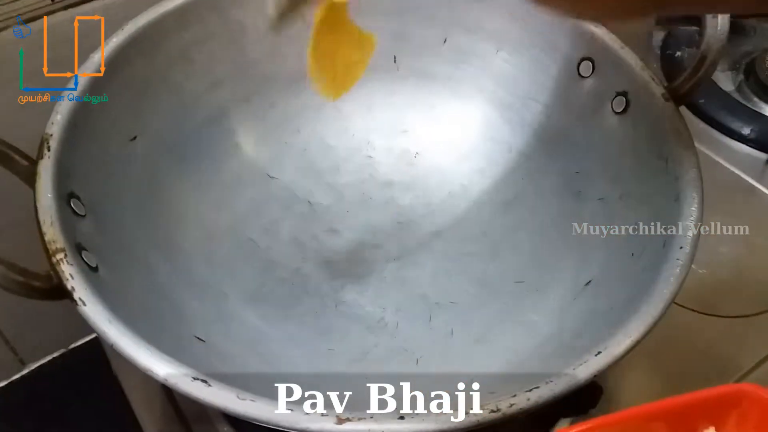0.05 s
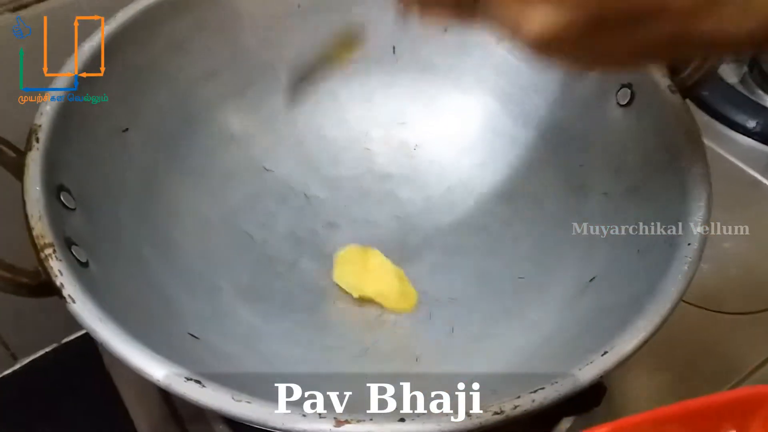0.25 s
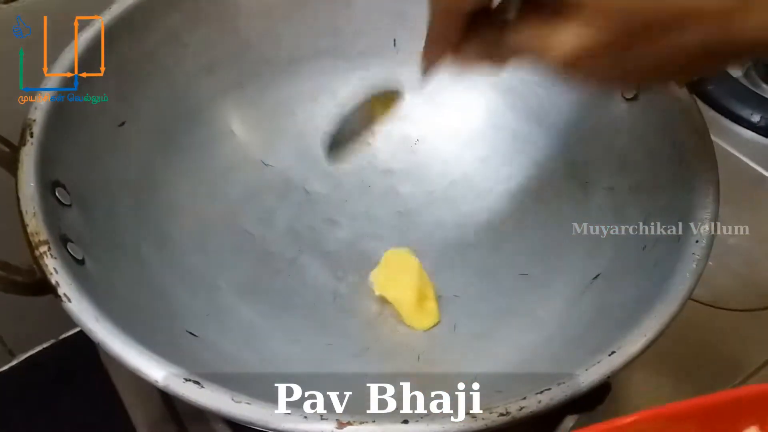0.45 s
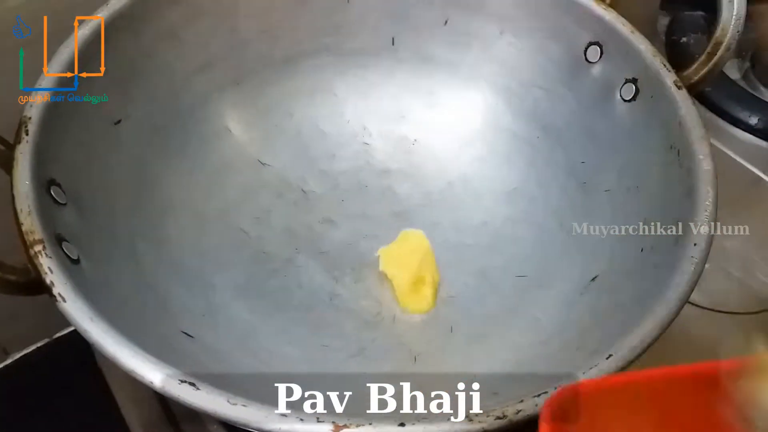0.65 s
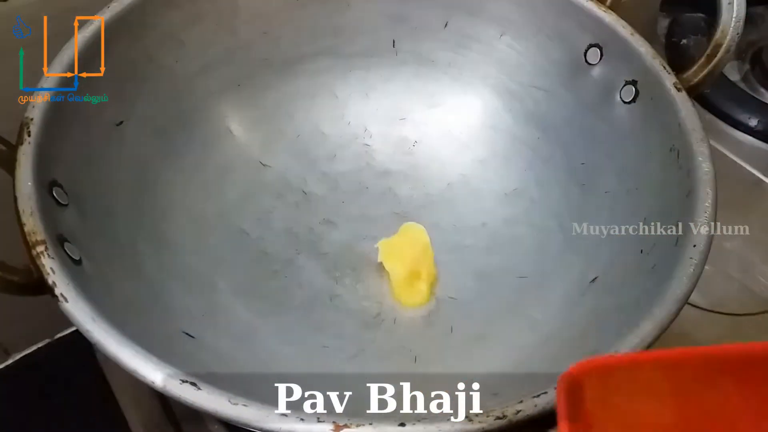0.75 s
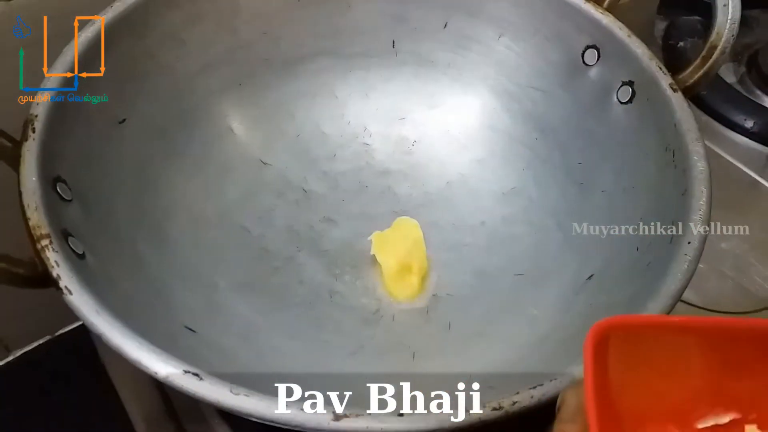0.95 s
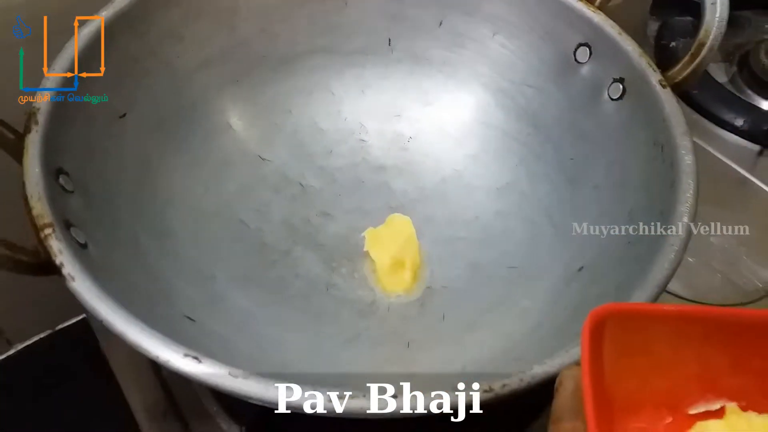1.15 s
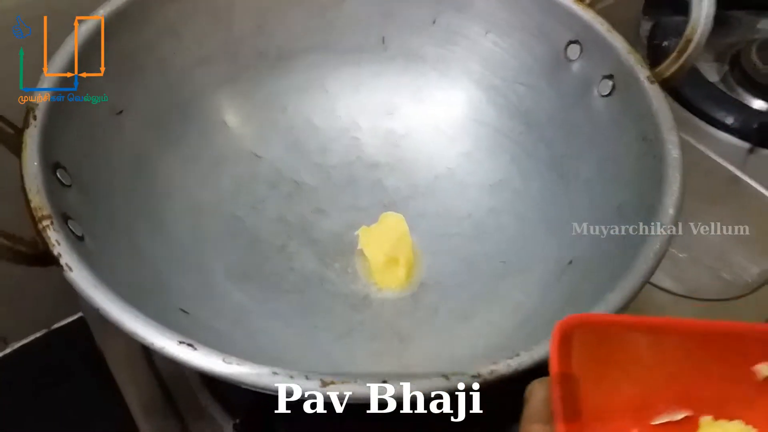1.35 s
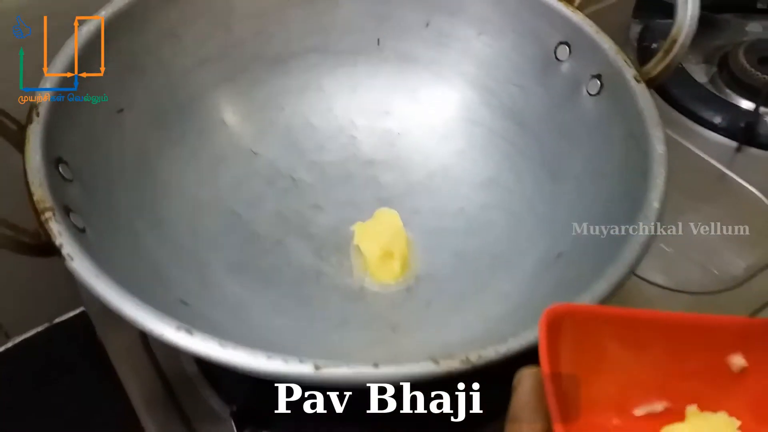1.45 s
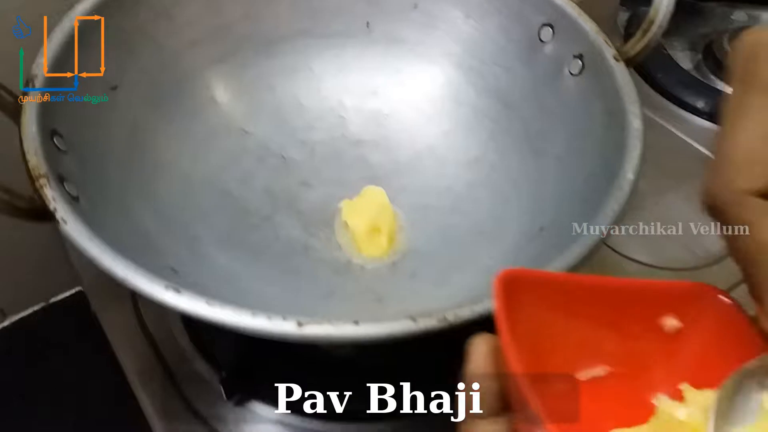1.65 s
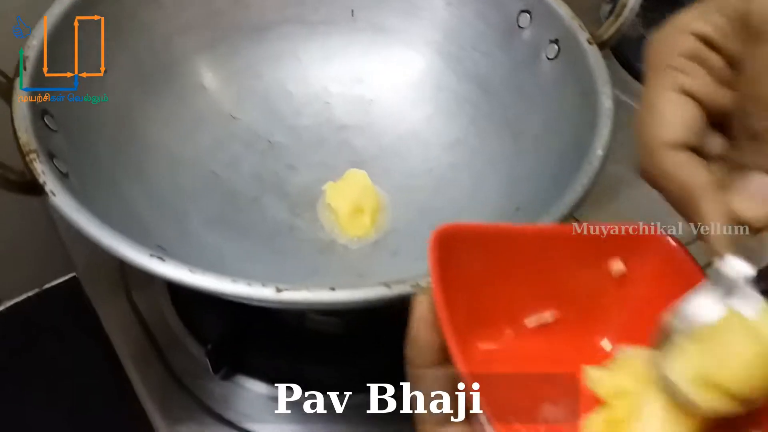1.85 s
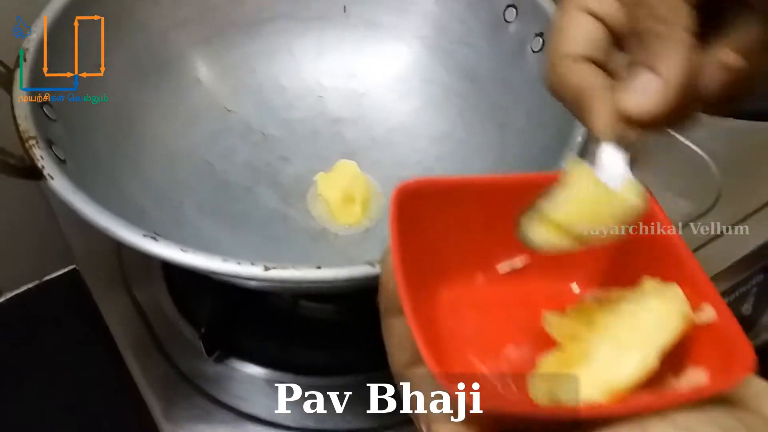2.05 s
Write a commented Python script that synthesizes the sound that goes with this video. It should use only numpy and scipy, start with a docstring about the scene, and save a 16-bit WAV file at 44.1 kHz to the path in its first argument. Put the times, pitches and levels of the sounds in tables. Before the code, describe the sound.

Butter lands in a hot metal wok and bursts into a dense, bright sizzle with scattered pops and a brief low metallic hum; later a spoon knocks a plastic dish three times, close up in a small kitchen.

```python
"""Over burner hiss, room rumble and a thin whine a faint hiss swells, close to a phone microphone in a small kitchen.
At 0.22 s a lump of butter lands in a hot metal wok: steam bubbles burst as a dense fizz (clumped noise puffs)
with scattered pops (resonated bursts), and the wok and its stand hum (noise-driven modes) while the lump slides.
From 1.06 s a spoon knocks a plastic dish three times (damped sines), then scrapes it (four resonant clicks)."""
import sys
import numpy as np
from scipy import signal
from scipy.fft import rfft, irfft
from scipy.io import wavfile
from scipy.ndimage import uniform_filter1d

SR = 44100
rng = np.random.default_rng(int(sys.argv[2]) if len(sys.argv) > 2 else 0)


def to_wav(s):
    """Save 16-bit WAV."""
    ch = np.atleast_2d(s).T  # columns
    pcm = np.round(np.clip(ch, -1, 1) * 32767)  # PCM
    wavfile.write(sys.argv[1], SR, pcm.astype(np.int16))


def amp(db):
    return 10 ** (np.asarray(db, float) / 20)


N = 92610


def evened(x):
    """Scales to rms 1."""
    return x / np.sqrt(np.mean(x ** 2) + 1e-20)


def add(mix, start_s, sound):
    """Mixes a sound in at a time, cut at the end of the mix."""
    part = mix[round(start_s * SR):][:len(sound)]
    part += sound[:len(part)]


def coloured(x, points):
    """Filters by a spectrum table (Hz, dB), interpolated over log frequency; rms 1."""
    point_hz, point_db = np.transpose(points)
    hz = np.fft.rfftfreq(len(x), 1 / SR)
    gain_db = np.interp(np.log(hz + 1), np.log(point_hz + 1), point_db, -90)
    return evened(irfft(rfft(x) * amp(gain_db), len(x)))


def curve(table, axis):
    """Gain over time from one dB column, rising from zero when the butter lands."""
    land_s, rise_s = 0.2213, 0.0031
    t = np.arange(N) / SR
    rows = np.array(table)
    return amp(np.interp(t, rows[:, 0], rows[:, axis])) * np.clip((t - land_s) / rise_s, 0, 1)


def resonate(x, hz, width_hz):
    """One-pole lowpass shifted up to hz: a resonance of gain 1."""
    turn = np.exp(2j * np.pi * hz * np.arange(len(x)) / SR)
    r = np.exp(-np.pi * width_hz / SR)
    return 2 * (turn * signal.lfilter([1 - r], [1, -r], x / turn)).real


def resonate_twice(x, hz, width_hz):
    """Two equal resonances in a row, for steeper skirts and a softer onset."""
    return resonate(resonate(x, hz, width_hz), hz, width_hz)


def burner_and_room():
    """Steady burner hiss and room rumble: noise of one fixed colour."""
    # Spectrum of burner and room: (frequency [Hz], density [dB per Hz, relative])
    air_colour = [(30, -21.5), (96, -1.5), (161, -4.5), (202, -12), (230, -11), (681, -19.5), (755, -26),
                  (5800, -31), (7120, -9.5), (8320, -27), (11000, -30.5), (14300, -37)]
    return amp(-66) * coloured(rng.standard_normal(N), air_colour)


def whine():
    """Thin steady electrical whine: sines."""
    # Whine partials: (frequency [Hz], rms level [dB])
    partials = [(14820, -74.5)]
    t = np.arange(N) / SR
    return sum(amp(db) * np.sqrt(2) * np.sin(2 * np.pi * hz * t) for hz, db in partials)


def swelling_hiss():
    """Faint hiss that ramps up before the landing and then stays: coloured noise."""
    # Spectrum of the hiss: (frequency [Hz], density [dB per Hz, relative])
    swell_colour = [(3200, -8), (4600, -12), (5600, -7), (7000, -37)]
    start_s, rise_s, level_db = 0.073, 0.036, -76
    ramp = np.clip((np.arange(N) / SR - start_s) / rise_s, 0, 1)
    return amp(level_db) * coloured(rng.standard_normal(N), swell_colour) * ramp


def bubbles():
    """Clumped bursts, each a tiny puff of dying noise, mostly small, over smooth steam hiss."""
    bursts_per_s, spread_db, burst_t60_s = 4000, 3.5, 0.011
    clump_db, hiss_db = 1, 0
    drift = uniform_filter1d(rng.standard_normal(N), size=350)
    clump = evened(uniform_filter1d(drift, size=350))
    burst = rng.random(N) < bursts_per_s / SR
    size = burst * amp(spread_db * np.minimum(rng.exponential(1, N), 5))
    # -120 because amp() halves the decibels of a power
    power = signal.lfilter([1], [1, -amp(-120 / burst_t60_s / SR)], size ** 2)
    puffs = evened(np.sqrt(power) * rng.standard_normal(N))
    return amp(clump_db * clump) * (puffs + amp(hiss_db) * rng.standard_normal(N))


def sizzle():
    """The same bubbles filtered into three ranges, each with its own level over time."""
    # Sizzle levels: (time [s], fizz [dB], treble [dB], coarse bubbling [dB])
    fizz_levels = [(.225, -33.5, -56, -67), (.25, -35.5, -40, -48), (.275, -37, -43.5, -43.5),
                   (.31, -39.5, -47.5, -51), (.36, -38, -41.5, -56), (.44, -34.5, -46.5, -53),
                   (.52, -35.5, -43, -58.5), (.58, -38.5, -45.5, -58), (.69, -37, -48.5, -56.5),
                   (.73, -37, -47, -43.5), (.9, -35.5, -48, -49.5), (1.0, -35.5, -46, -50),
                   (1.12, -35, -45.5, -56), (1.27, -39, -50.5, -58.5), (1.38, -37, -47.5, -49),
                   (1.5, -38.5, -49.5, -54), (1.7, -38.5, -50, -46.5), (1.82, -40.5, -51.5, -57.5),
                   (2.1, -41, -52, -62.5)]
    # Spectra of fizz, treble and coarse bubbling: (frequency [Hz], density [dB per Hz, relative])
    fizz_colour = [(1290, -43), (2200, -24.5), (2580, -20), (3200, -3), (3580, -8.5), (4080, -2),
                   (5790, -4.5), (7600, 0), (8230, -1.5), (9600, -18.5), (12500, -48)]
    treble_colour = [(6120, -56.5), (10400, -11.5), (12000, -9), (13300, -5.5), (15000, -11), (16200, -27)]
    coarse_colour = [(650, -14), (1100, -11), (1630, -3), (2390, 5.5), (2740, -5), (3000, 1.5), (3900, 2.5),
                     (6600, -120)]
    b = bubbles()
    colours = (fizz_colour, treble_colour, coarse_colour)
    return sum(coloured(b, colour) * curve(fizz_levels, axis=k + 1) for k, colour in enumerate(colours))


def wok():
    """The boiling lump shakes the wok's modes and its stand as it slides: noise through resonances."""
    # Slide levels: (time [s], stand's rumble [dB], lowest ring [dB],
    # low modes with a broad 900 Hz clatter [dB], middle modes [dB])
    slide_levels = [(.225, -55, -51.5, -61, -61), (.265, -48, -49, -41, -58.5), (.31, -52, -46, -44, -59),
                    (.37, -53.5, -66, -53, -64.5), (.52, -61.5, -56.5, -57, -71),
                    (.6, -65, -65.5, -63, -67.5), (.645, -49, -46, -53, -56), (.7, -58, -34.5, -55, -65.5),
                    (.77, -58, -56.5, -56.5, -53), (.83, -60.5, -67, -51, -51),
                    (.92, -64.5, -74, -60, -61.5), (1.04, -74.5, -68, -72, -83)]
    # Modes in those four groups: (frequency [Hz], width [Hz], level within the group [dB])
    mode_groups = [
        [(114.2, 20, -1.5), (173, 45, 5)],
        [(249.4, 9.8, 0)],
        [(333, 32, 2.5), (381, 9.4, -7.5), (922, 232, 4)],
        [(542, 43, 1), (939, 21, -5)],
    ]
    out = np.zeros(N)
    shake = rng.standard_normal(N)
    fade_s = 0.1
    fade_out = np.clip((slide_levels[-1][0] + fade_s - np.arange(N) / SR) / fade_s, 0, 1)
    for k, group in enumerate(mode_groups):
        # each resonance is twice as wide, since two in a row narrow the band
        ring = sum(amp(db) * evened(resonate_twice(shake, hz, 2 * width_hz)) for hz, width_hz, db in group)
        out += evened(ring) * curve(slide_levels, axis=k + 1) * fade_out
    return out


def pops():
    """Larger bubbles spit: short dying noise bursts, each resonated around one pitch."""
    # Pops: (time [s], peak before the highpass [dB], pitch [Hz])
    pop_list = [(.2236, -26, 7700), (.2596, -27, 4000), (.4345, -14, 13000), (.6399, -21, 7600),
                (.7092, -23, 7700), (.8412, -21, 5100), (.9577, -22, 3750), (1.0031, -26, 3200),
                (1.0646, -18, 7600), (1.0788, -20, 7400), (1.1482, -24, 7100), (1.1652, -22, 7300),
                (1.239, -23, 7500), (1.3448, -29, 13000), (1.3645, -29, 13000), (1.3895, -25, 6000),
                (1.4082, -30, 13000), (1.4386, -30, 13000), (1.576, -22, 7600), (1.6551, -22, 7200)]
    t60_s, width_share = 0.008, 0.3  # width as a share of the pitch
    out = np.zeros(N)
    t = np.arange(900) / SR
    for start_s, db, hz in pop_list:
        burst = rng.standard_normal(len(t)) * amp(-60 * t / t60_s)
        pop = resonate_twice(burst, hz, width_share * hz)
        add(out, start_s, amp(db) * pop / abs(pop).max())
    return signal.sosfilt(signal.butter(4, 2000, "high", fs=SR, output="sos"), out)


def dish(tilt_db_per_octave, pitch_factor, cut_hz):
    """Plastic modes, alternating in sign, swell while the spoon presses; the holding hand damps the low ones."""
    # Dish modes: (frequency before the pitch factor [Hz], level before the tilt [dB])
    modes = [(600, -25.5), (950, -26.5), (1250, -3), (1600, 0), (1850, 8.5), (2050, 5.5), (2400, -3.5),
             (2750, 1), (3000, -1.5), (3600, -3), (4100, -7), (4500, -2), (4950, -0.5), (5350, 0.5),
             (5800, -6.5), (7500, -12)]
    t60_s, t60_at_hz = 0.010, 1900  # shorter above, longer below
    contact_s = 0.0003
    t = np.arange(3000) / SR
    ring = np.zeros(len(t))
    for k, (hz, db) in enumerate(modes):
        level_db = db + tilt_db_per_octave * np.log2(hz / 2000)
        decay_db = -60 * t / t60_s * np.sqrt(hz / t60_at_hz)
        ring += (-1) ** k * amp(level_db + decay_db) * np.sin(2 * np.pi * hz * pitch_factor * t)
    ring *= np.sin(np.pi / 2 * np.clip(t / contact_s, 0, 1)) ** 2
    return signal.sosfilt(signal.butter(8, cut_hz, "high", fs=SR, output="sos"), ring)


def spoon_knocks():
    """Three knocks with quick bounces; also the shortened first blows alone, which excite the room."""
    # Knock times [s]
    knock_s = [1.0581, 1.3702, 1.5507]
    # Knocks: (peak [dB], tilt [dB per octave], pitch factor [ratio], lowest frequency left to ring [Hz])
    knock_list = [(-13, 0, 0.95, 483), (-19.5, 1.5, 0.99, 1440), (-4.5, 6.5, 1, 1030)]
    # Spoon bounces: (delay [s], level against the first blow [dB])
    bounces = [(.0013, -5), (.0024, -7)]
    out, blows = np.zeros((2, N))
    for start_s, (db, *colour) in zip(knock_s, knock_list):
        hit = dish(*colour)
        hit /= abs(hit).max()
        extra_decay_db = -60 * np.arange(len(hit)) / SR / 0.010  # 60 dB in 10 ms
        add(blows, start_s, amp(db + extra_decay_db) * hit)
        for delay_s, bounce_db in [(0, 0)] + list(bounces):
            add(out, start_s + delay_s, amp(db + bounce_db) * hit)
    return out, blows


def spoon_scrape():
    """The spoon catches and slips as it scrapes: each slip is an impulse through a double resonance."""
    # Slips: (time [s], peak [dB])
    slips = [(1.655, -40), (1.674, -33.5), (1.695, -37.5), (1.716, -37)]
    out = np.zeros(N)
    slip = resonate_twice(signal.unit_impulse(SR // 20), 1900, width_hz=200)
    for start_s, db in slips:
        add(out, start_s, amp(db) * slip / abs(slip).max())
    return out


def room(x):
    """Small-kitchen echo: sparse taps of random sign, each band dying at its own speed."""
    # Reverberation: (frequency [Hz], t60 [s])
    kitchen_t60 = [(500, 0.44), (1500, 0.37), (4000, 0.12), (9000, 0.24)]
    taps = np.zeros(SR // 2)
    at = np.arange(200, SR // 2 - 20, 20)  # one tap somewhere in every 20 samples
    taps[at + rng.integers(0, 20, len(at))] = rng.choice([-1., 1.], len(at))
    hz, t, bands = signal.stft(taps, SR, nperseg=256)
    t60_s = np.interp(hz, *np.transpose(kitchen_t60))[:, None]
    tail = signal.istft(bands * amp(-60 * t / t60_s), SR, nperseg=256)[1]
    return signal.fftconvolve(x, tail / np.linalg.norm(tail))[:N]


def scene():
    """All sources and the room's answer to knocks and pops, one microphone on both channels."""
    knocks, blows = spoon_knocks()
    spits = pops()
    blows_wet_db, pops_wet_db = 1.5, -8
    echo = room(amp(blows_wet_db) * blows + amp(pops_wet_db) * spits)
    background = burner_and_room() + whine() + swelling_hiss()
    mono = background + sizzle() + wok() + spits + knocks + spoon_scrape() + echo
    return np.array([mono, mono])


def roll_off(x):
    """The treble ends steeply here."""
    return signal.sosfilt(signal.butter(12, 16830, fs=SR, output="sos"), x)


def record(dry):
    """The microphone's response dips around one frequency and ends at a band limit."""
    notch_hz, notch_width_hz, notch_depth = 10300, 2260, 0.62
    edge_hz = 15950
    dipped = np.array([v - notch_depth * resonate(v, notch_hz, notch_width_hz) for v in dry])
    lowpass = signal.firwin(301, edge_hz, window=("kaiser", 7), fs=SR)
    mix = signal.oaconvolve(dipped, lowpass[None], "same")
    return roll_off(mix)


dry = scene()
out = record(dry)
to_wav(out)
```